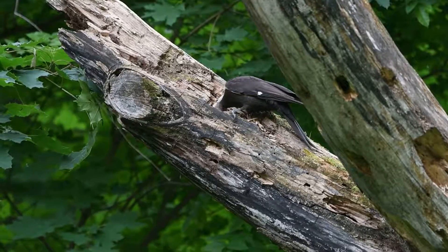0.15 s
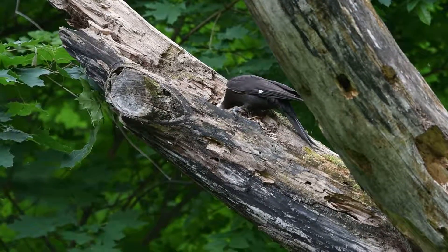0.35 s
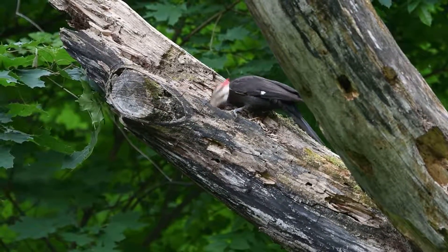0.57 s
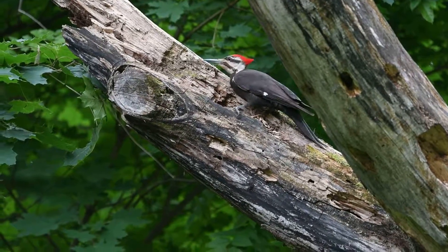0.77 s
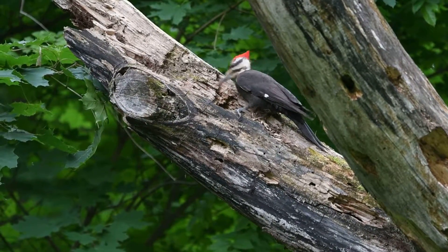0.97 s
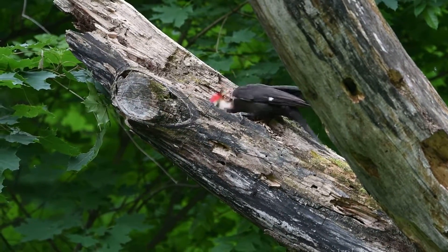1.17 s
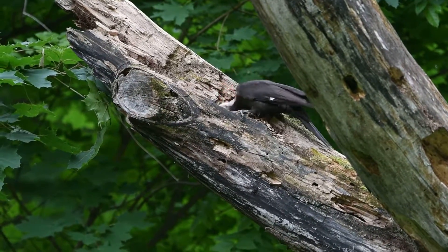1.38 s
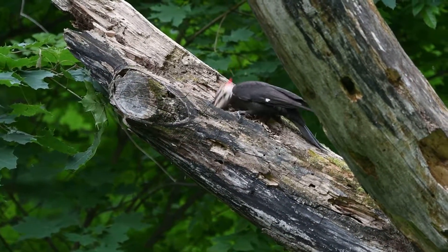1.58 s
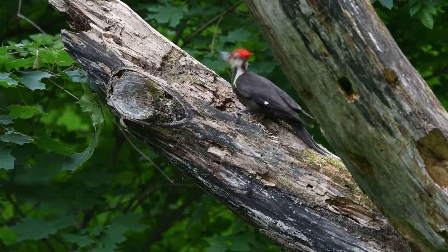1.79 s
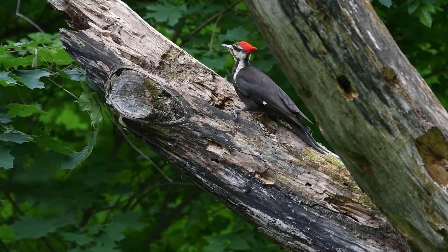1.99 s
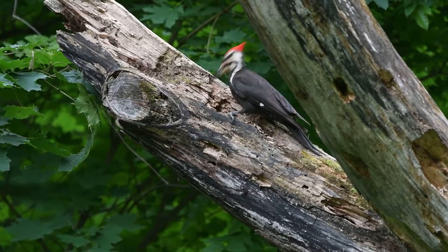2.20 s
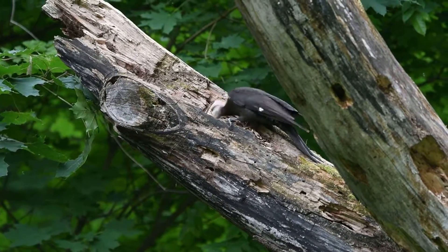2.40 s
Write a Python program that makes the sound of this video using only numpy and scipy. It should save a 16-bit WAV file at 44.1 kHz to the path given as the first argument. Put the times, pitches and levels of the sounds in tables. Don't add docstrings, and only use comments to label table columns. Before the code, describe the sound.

A woodpecker gives a few isolated knocks on a dead trunk, with small bark chips falling. Before that, a loud plastic snap sounds close to the right microphone. Faint bird whistles, leaf hiss and distant traffic hum lie behind.

```python
import sys
import numpy as np
from scipy import signal
from scipy.io import wavfile
from scipy.ndimage import uniform_filter1d

SR = 44100
rng = np.random.default_rng(int(sys.argv[2]) if len(sys.argv) > 2 else 0)


def output_pcm(signal):
    pcm = np.clip(np.atleast_2d(signal).T, -1, 1) * 32767
    wavfile.write(sys.argv[1], SR, np.round(pcm).astype(np.int16))


def convert_level_to_amplitude(level_db):
    exponent = np.asarray(level_db, float) / 20
    return 10 ** exponent


N = 108045


def evened(x):
    return x / np.sqrt(np.mean(x ** 2) + 1e-30)


def read(points, hz):
    f, value = np.transpose(points)
    return np.interp(np.log(hz + 1), np.log(f + 1), value)


def add(mix, s, sound):
    part = mix[..., round(s * SR):][..., :sound.shape[-1]]
    part += sound[..., :part.shape[-1]]


def resonate(x, hz, width):
    turn = np.exp(2j * np.pi * np.cumsum(hz * np.ones(x.shape[-1])) / SR)
    r = np.exp(-np.pi * width / SR)
    return 2 * (turn * signal.lfilter([1 - r], [1, -r], x / turn + 1e-18)).real


def resonate_twice(x, hz, width):
    return resonate(resonate(x, hz, width), hz, width)


def ring(hz, t60, contact_ms):
    t, rise = np.arange(3500) / SR, contact_ms / 1000
    swell = np.sin(np.pi / 2 * np.minimum(t / rise, 1)) ** 2
    decay = convert_level_to_amplitude(-60 * np.maximum(t - rise, 0) / t60)
    return swell * decay * np.sin(2 * np.pi * hz * t)


def trunk():
    # (time [s], crack level [dB], knock level [dB], thud level [dB], contact [ms])
    pecks = [(1.2106, -33.5, -42.5, -42.5, 1.9), (1.208, -57, -54, -54, 2.0),
             (1.2174, -54, -54, -52.5, 1.4), (1.4089, -56, -55, -55, 2.3), (1.413, -55, -48, -71, 3.3),
             (1.446, -55, -54, -71, 0.87), (1.44, -68, -49, -79, 13), (1.722, -52, -54.5, -58, 6),
             (1.805, -72, -71, -56, 4.0), (1.826, -58, -64, -82, 3.9), (2.205, -66, -69, -60, 4.0),
             (2.3951, -53, -45, -54, 1.6)]
    # (frequency [Hz], t60 [s], level [dB])
    crack_modes = [(3480, 0.0046, 0), (4240, 0.0011, -0.5), (5530, 0.0021, 3), (6250, .004, 7.5),
                   (7200, 0.002, -4), (8550, 0.0023, -8), (9770, 0.0035, -6), (11900, 0.003, -22)]
    # (frequency [Hz], t60 [s], level [dB])
    knock_modes = [(1160, 0.0067, -9), (1430, 0.0043, -4), (1840, 0.01, 1), (2140, 0.012, -3)]
    # (frequency [Hz], t60 [s], level [dB], swell [ms])
    thud_modes = [(128, 0.044, -16, 22), (264.7, 0.065, 0, 17), (512.7, 0.058, -1, 9.9),
                  (583, 0.046, -1.5, 3.2), (725, 0.032, -8.5, 1.8)]
    knock_sides = convert_level_to_amplitude(np.array([[-2.5], [0]]))

    def rung(grit, modes):
        sound = sum(convert_level_to_amplitude(db) * resonate_twice(grit, hz, 3.2 / t60) for hz, t60, db in modes)
        return sound / abs(sound).max()

    out, t = np.zeros((2, N)), np.arange(3500) / SR
    noises = rng.standard_normal((len(pecks), 2, 3500))
    for (s, crack_db, knock_db, thud_db, ms), noise in zip(pecks, noises):
        grit = noise[:1] + 0.46 * noise
        grit = grit * np.minimum(t / 0.00033, 1) * np.exp(-t * 1000 / ms)
        crack = convert_level_to_amplitude(crack_db) * rung(grit, crack_modes)
        knock = convert_level_to_amplitude(knock_db) * rung(grit, knock_modes) * knock_sides
        thud = sum(convert_level_to_amplitude(db) * ring(hz, t60, swell_ms) for hz, t60, db, swell_ms in thud_modes)
        add(out, s, crack + knock + convert_level_to_amplitude(thud_db) * thud)
    return out


def forest(x):
    t = np.arange(SR // 8) / SR
    taps = rng.standard_normal((2, len(t))) * (rng.random((2, len(t))) < .05)
    taps = taps * convert_level_to_amplitude(-60 * t / 0.13) * (t > .004)
    return signal.fftconvolve(x, taps / np.linalg.norm(taps[0]), axes=1)[:, :N]


def housing():
    # (time [s], shell level [dB], shell frequency [Hz], tick level [dB], contact [ms])
    snaps = [(0.1107, -39.5, 1830, -73, 1.2), (0.1123, -38.5, 1370, -47.5, 0.59),
             (.1245, -50, 1840, -73, 1.5), (.1445, -41, 1000, -70, 0.73), (0.1474, -42, 1150, -63, 0.91),
             (0.155, -33, 1510, -51, 0.2), (0.1597, -38, 1266, -62, 1.47), (0.162, -36, 1326, -70, 1.8),
             (0.1639, -18, 1515, -33, 0.28), (0.1664, -36, 1880, -68, 0.93), (.171, -46, 1900, -67, 1.6),
             (0.1865, -43, 1550, -58, 1.3), (.1962, -16, 1890, -13, 1.04), (0.207, -38, 1980, -64, 1.2)]
    # (frequency [Hz], t60 [s], left level [dB], right level [dB])
    tick_modes = [(535, 0.015, -35, -37), (990, 0.0095, -38, -20), (3110, .005, -26, -17),
                  (3980, 0.0064, -13, -11.5), (4570, 0.0043, -18.5, -21), (5410, 0.0061, -13.5, -17.5),
                  (6390, 0.0029, -19, -7), (6830, 0.0039, -23, 1), (8400, 0.0047, -18, -10.5),
                  (9600, .003, -28, -33), (11600, .0025, -25, -33), (13400, .002, -42, -37)]
    # (time [s], frequency [Hz], right level [dB], left level [dB], contact [ms])
    pings = [(.1545, 8500, -58, -64, .6), (.1545, 5900, -56, -56, .7), (0.1603, 6100, -44, -61, 1.1),
             (.1645, 8600, -50, -66, .5), (.1647, 4800, -52, -48, 0.48), (0.1652, 6500, -48, -50, .6),
             (0.187, 7000, -37, -46, 1.2), (0.1866, 8500, -49, -56, .7), (0.1897, 4400, -58, -48, 1.5),
             (.2035, 6200, -50, -54, 1.5), (0.206, 7200, -43, -52, 1.2), (0.2064, 5100, -45, -52, 1),
             (.207, 8600, -46, -52, .9), (0.198, 1152, -51.5, -60, 9), (.1968, 10540, -41, -45, 0.42),
             (0.197, 12900, -46, -47, 0.33)]
    shell_t60, ping_t60 = 0.012, 0.0064
    slap_db, slap_t60 = -14.5, 0.0042
    rattle_db, rattle_t60 = -28, 0.057
    # (channel, delay [s], shell level [dB], slap and rattle level [dB])
    sides = ((0, .0006, -36, -14), (1, .0004, 0, 0))

    out, t = np.zeros((2, N)), np.arange(3500) / SR
    noises = rng.standard_normal((len(snaps), 2, 3500))
    for (s, shell_db, shell_hz, tick_db, ms), noise in zip(snaps, noises):
        shell = convert_level_to_amplitude(shell_db) * ring(shell_hz, shell_t60 * ms, ms)
        slap = evened(resonate_twice(noise, 2100, 4500)) * np.minimum(t / 0.00016, 1)
        slap = slap * convert_level_to_amplitude(shell_db + slap_db - 60 * t / slap_t60)
        rattle = evened(resonate(resonate(noise, 4900, 5500), 4600, 5500))
        rattle = rattle * np.minimum(t * 1000 / ms, 1) ** 2
        rattle = rattle * convert_level_to_amplitude(tick_db + rattle_db - 60 * t / rattle_t60)
        late_slap = np.roll(slap[1], round(ms * 30))
        for side, late, side_db, loose_db in sides:
            tick = 0
            for k, mode in enumerate(tick_modes):
                hz, t60 = mode[:2]
                swell_ms = ms * min(1, (6500 / hz) ** 1.3)
                tick = tick + convert_level_to_amplitude(mode[2 + side]) * (-1) ** k * ring(hz, t60 * ms, swell_ms)
            loose = convert_level_to_amplitude(loose_db) * (rattle[side] + late_slap)
            add(out[side], s + late, convert_level_to_amplitude(side_db) * shell + convert_level_to_amplitude(tick_db) * tick + loose)
    for s, hz, right_db, left_db, ms in pings:
        add(out, s, convert_level_to_amplitude(np.array([[left_db], [right_db]])) * ring(hz, ping_t60 * ms, ms))
    return out


def scuffs():
    # (start [s], length [s], level [dB], centre [Hz])
    falls = [(1.245, 0.097, -61.5, 6300), (1.249, 0.026, -62, 3100), (1.1, 0.066, -67, 1660),
             (1.2165, .004, -50, 3950), (1.219, 0.011, -59, 950), (2.195, 0.027, -55.5, 636),
             (1.6, 0.029, -54, 430), (1.46, .04, -65, 7000), (1.72, 0.035, -64, 4400),
             (1.209, 0.02, -54.5, 1300), (1.4085, .013, -50, 2140), (1.409, 0.0081, -59, 3700),
             (1.437, 0.015, -56.5, 1600), (1.4455, .0035, -57, 7000), (1.2, .004, -59, 7900),
             (1.6, .01, -56, 7100), (2.394, 0.0099, -54.5, 2170), (1.678, 0.0092, -61, 2000)]
    out, t = np.zeros((2, N)), np.arange(4000) / SR
    for (s, length, db, hz), draw in zip(falls, rng.random((len(falls), 2, 2, 4000))):
        grains = (draw[0] - .5) * (draw[1] < .15)
        swell = np.sin(np.pi * np.clip(t / length, 0, 1) ** 0.42)
        add(out, s, convert_level_to_amplitude(db) * evened(resonate_twice(grains, hz, 0.3 * hz)) * swell)
    return out


def birds():
    # (start [s], length [s], from [Hz], to [Hz], level [dB])
    whistles = [
        (.48, .22, 3990, 3880, -79),
        (.92, .085, 3340, 3110, -71),
        (.99, .06, 3090, 2990, -70.5),
        (1.05, .16, 3020, 2890, -73.5),
        (1.32, .11, 5210, 5030, -70.5),
        (1.405, .17, 4995, 4985, -68.5),
        (1.635, .07, 4985, 4980, -75.5),
    ]
    out, t = np.zeros((2, N)), np.arange(16000) / SR
    noises = rng.standard_normal((len(whistles), 2, 2, 16000))
    for (s, length, from_hz, to_hz, db), noise in zip(whistles, noises):
        u = np.clip(t / length, 0, 1)
        hz = to_hz + (from_hz - to_hz) * (1 - u) ** 2.24
        flutter = 1 + 0.22 * evened(uniform_filter1d(noise[0] + 1j * noise[1], size=700, axis=1))
        whistle = (flutter * np.exp(2j * np.pi * np.cumsum(hz) / SR)).real
        add(out, s, convert_level_to_amplitude(db) * np.sin(np.pi * u ** .7) ** 0.4 * whistle)
    return out


def drones():
    # (frequency [Hz], width [Hz], level [dB])
    engines = [(78.1, 19, -61), (189.2, 3.3, -72.5), (231.3, 5.5, -66), (506.4, 8.8, -76)]
    # (time [s], level [dB])
    passing = [(0, -8.5), (.9, -1.5), (1.1, 5), (1.6, 3.5), (1.85, -3.5), (2.45, -6.5)]
    # (time [s], level [dB])
    bumps = [(0.299, -46), (0.576, -44.5), (1.036, -45.5), (1.781, -42.5), (2.264, -50)]
    # (frequency [Hz], level [dB])
    whine_tones = [(9362, -104), (10535, -94), (11703, -99), (12871, -116), (14045, -104)]

    t, noises = np.arange(N) / SR, rng.standard_normal((len(engines), N))
    far = [convert_level_to_amplitude(db) * evened(resonate_twice(noise, hz, width))
           for noise, (hz, width, db) in zip(noises, engines)]
    core = np.sin(2 * np.pi * 232 * t + 1.56 * np.sin(2 * np.pi * 1.7 * t))
    far[2] = 0.5 * far[2] + convert_level_to_amplitude(-66.5) * np.sqrt(2) * core
    swell = convert_level_to_amplitude(np.interp(t, *np.transpose(passing))) - 1
    for s, db in bumps:
        add(far[0], s, convert_level_to_amplitude(db) * ring(81.6, .09, 21))
    whine = sum(convert_level_to_amplitude(db) * np.sqrt(2) * np.sin(2 * np.pi * hz * t) for hz, db in whine_tones)
    return sum(far) + swell * far[2] + whine


def air():
    # (frequency [Hz], density [dB per Hz])
    hum_points = [(12, -68), (20, -24), (81, 1.5), (123, -10), (232, -9.5), (260, -14), (515, -15.5),
                  (576, -20.5), (900, -24), (1170, -54), (1980, -120)]
    # (frequency [Hz], density [dB per Hz])
    hiss_points = [(600, -13.5), (1000, -1), (1700, 1), (2300, -4.5), (4000, -3.5), (7000, -6),
                   (10500, -11), (16000, -18)]
    # (frequency [Hz], left minus right [dB])
    tilt = [(300, 0.5), (500, -3), (1000, -1), (1700, -5.5), (2500, 0.5), (6000, -2.5), (9500, 2),
            (12000, 0.5)]
    # (frequency [Hz], left-right correlation [-1 to 1])
    likeness = [(60, 1), (130, 0.92), (260, 0.8), (380, 0.3), (790, 0.39), (1140, 0.047), (3440, -0.15),
                (5000, -0.028)]
    hum_db, hiss_db, edge_hz = -54, -61.5, 15780

    frames, hz = N // 256 + 5, np.fft.rfftfreq(1024, 1 / SR)
    a, b, c, d, patches = rng.standard_normal((frames, 513, 5)).T
    patches = uniform_filter1d(patches, size=12, axis=0)
    patches = evened(uniform_filter1d(patches, size=14, axis=1))
    gusts = evened(uniform_filter1d(rng.standard_normal(frames), size=20))
    same = np.clip(read(likeness, hz), -1, 1)[:, None]
    left = a + 1j * b
    right = same * left + np.sqrt(1 - same ** 2) * (c + 1j * d)
    z = np.array([left, right]) * convert_level_to_amplitude(0.77 * patches + 0.4 * gusts)
    hum = convert_level_to_amplitude(2 * read(hum_points + [(1400, -64)], hz))
    hiss = convert_level_to_amplitude(2 * read([(300, -38)] + hiss_points, hz))
    power = hum / hum.sum() * convert_level_to_amplitude(2 * hum_db) + hiss / hiss.sum() * convert_level_to_amplitude(2 * hiss_db)
    both = np.sqrt(power) * (hz < edge_hz)
    shape = both * convert_level_to_amplitude(np.outer([.5, -.5], read(tilt, hz)))
    out = signal.istft(z * shape[:, :, None], nperseg=1024, noverlap=768)[1][:, :N]
    return evened(out) * np.linalg.norm(both)


def scene():
    wood = trunk()
    return housing() + wood + forest(convert_level_to_amplitude(-8.0) * wood) + scuffs() + birds() + air() + drones()


def band_limit(x):
    return signal.sosfilt(signal.butter(12, 15790, fs=SR, output="sos"), x)


def record(dry):
    # (frequency [Hz], width [Hz])
    notches = [(2600, 850), (7720, 1430)]
    open_s, open_rise_s = 0.035, 0.00214
    x = dry
    for hz, width in notches:
        x = signal.lfilter(*signal.iirnotch(hz, hz / width, SR), x)
    x = x * np.clip((np.arange(N) / SR - open_s) / open_rise_s, .004, 1)
    x = signal.sosfilt(signal.butter(8, 16200, fs=SR, output="sos"), x)
    return band_limit(x)


dry = scene()
out = record(dry)
output_pcm(out)
```